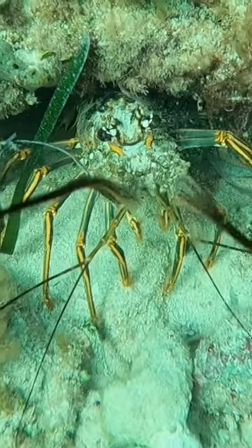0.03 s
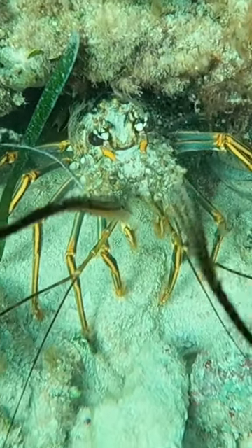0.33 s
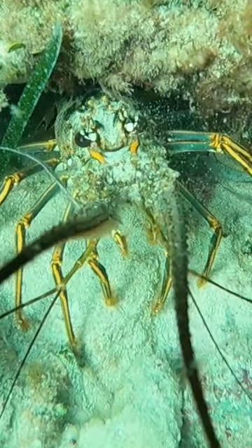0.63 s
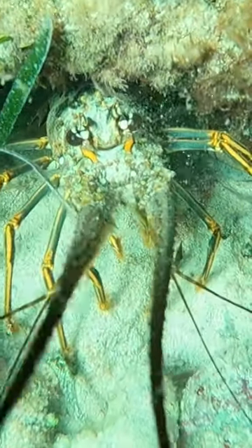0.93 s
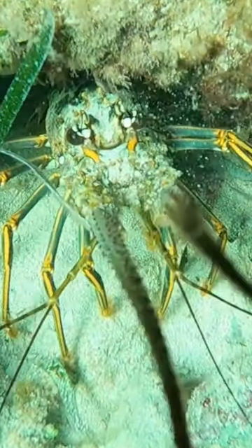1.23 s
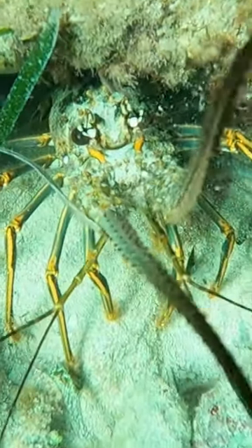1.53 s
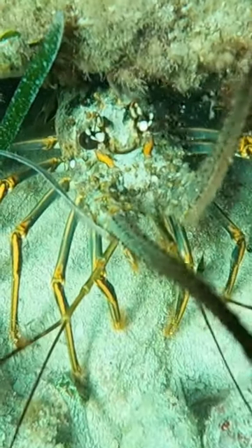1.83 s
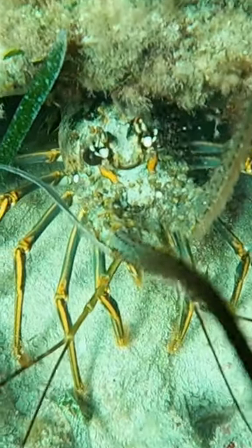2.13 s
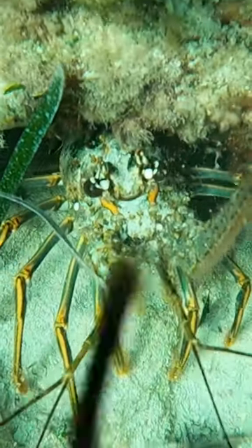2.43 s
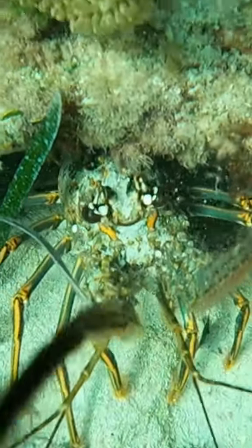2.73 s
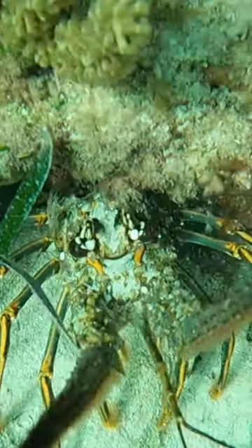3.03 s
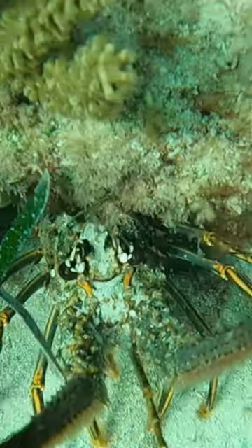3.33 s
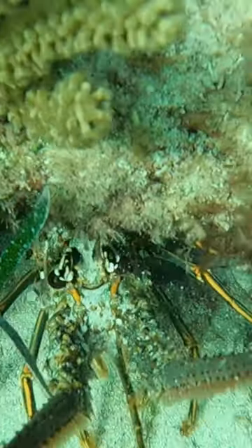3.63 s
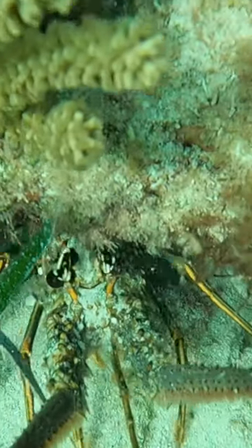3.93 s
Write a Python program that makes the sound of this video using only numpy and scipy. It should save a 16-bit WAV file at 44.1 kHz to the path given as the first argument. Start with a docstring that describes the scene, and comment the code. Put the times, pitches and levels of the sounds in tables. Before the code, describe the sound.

Water rumbles and washes against a hand-held camera's waterproof housing over a reef. Small muffled clicks and faint ticking run throughout, one hard knock hits the case before halfway, and brief gritty scrapes follow.

```python
"""Water sways against the waterproof housing of a hand-held camera over a reef: a deep surging rumble
and a fluttering wash. Short low tones are gulps of water and the hollow thump under harder clicks.
The reef ticks faintly. Small clicks and gritty scrapes come through the shell, and one hard knock
rings its modes. The housing muffles everything above 2 kHz."""
import sys
import numpy as np
from scipy import signal
from scipy.fft import rfft, irfft
from scipy.io import wavfile
from scipy.ndimage import uniform_filter1d, map_coordinates

SR = 44100
rng = np.random.default_rng(int(sys.argv[2]) if len(sys.argv) > 2 else 0)


def store_pcm(level_fs):
    """Save levels as 16-bit WAV."""
    pcm = np.round(np.clip(level_fs, -1, 1) * 32767).astype(np.int16)
    wavfile.write(sys.argv[1], SR, np.atleast_2d(pcm).T)


N = 176400

# Housing resonances. Each row: frequency in Hz, gain in dB, time to fall 60 dB in seconds.
HOUSING_MODES = [(313, -4, .09), (387, -14, .09), (449, 3.5, .052), (612, -7, .073), (677, 9, .05),
                 (774, -4.5, .11), (968, 6, .036), (1068, 8.5, .048), (1166, 4, .046), (1255, -2, .052),
                 (1330, -14, .08), (1477, 3, .028), (1642, -12, .055), (1750, -10, .045)]
# Transmission of the shell. Each row: frequency in Hz, gain in dB.
SHELL_RESPONSE = [(100, -13), (250, -4), (330, -1), (450, -3), (540, -7), (700, -6), (800, -1), (880, -4),
                  (1050, -.5), (1260, 4), (1450, -6), (1750, -5), (2050, -21), (2600, -31), (3300, -53),
                  (4200, -62)]
# Sizes of reef tick. Each row: pitch in Hz, relative level in dB.
TICK_BANDS = [(620, -5.5), (820, -10.5), (1050, 0.5), (1270, 0.5), (1500, -10), (1750, -13)]
# Swell of the ticking. Each row: time in seconds, gain in dB.
CRACKLE_SWELL = [(0, -0.5), (0.699, 0), (1.1, -0.5), (1.4, 1), (2.1, 0), (2.749, 0.5), (3.3, 3), (3.6, 3),
                 (3.72, -1.5), (4, -11.5)]
# Colour of a rub on the case. Each row: frequency in Hz, gain in dB.
RUB_SPECTRUM = [(150, -9), (380, -5.5), (560, -18.5), (700, -11.5), (810, 3), (900, -9.5), (1050, -3),
                (1270, 9.5), (1450, -4), (1700, -9), (2000, -21), (2600, -30.5), (3300, -56.5), (4200, -63)]
# Scrapes. Each row: start and length in seconds, relative level in dB, tilt in dB per octave.
SCRAPES = [(0.236, 0.032, -49, -2.5), (1.391, 0.052, -49, 5), (1.786, 0.084, -47, 8),
           (1.852, 0.13, -54, 3.5), (2.134, 0.033, -47, 5), (2.251, 0.17, -49, 3), (2.381, 0.064, -38, -3),
           (2.464, 0.1, -35.5, 0), (3.105, 0.075, -47, 2), (3.326, 0.098, -45.5, 0.5),
           (3.513, 0.16, -56, 2.5)]
# Clicks. Each row: start in seconds, relative level in dB, scatter decay in seconds,
# tilt in dB per octave.
CLICKS = [(0.031, -44.5, .01, -2.5), (0.135, -42.5, 0.0044, 4), (.213, -37.5, 0.01, -1.5),
          (.244, -38.5, 0.014, -1.5), (0.368, -48, 0.0075, 5), (0.573, -54, 0.0044, 6.5),
          (.636, -45, .004, 2.5), (.727, -32, 0.0036, -3), (.784, -47.5, .003, 1.5),
          (0.871, -49, 0.024, 0.5), (.943, -35.5, 0.0039, -4.5), (.965, -40.5, .01, -6),
          (.998, -39.5, 0.0088, -3), (1.152, -45, 0.0056, -5), (1.192, -47.5, .005, 3),
          (1.299, -48.5, 0.0047, -2.5), (1.468, -47, 0.0031, -0.5), (1.625, -48.5, 0.013, 7.5),
          (1.913, -48, 0.0047, -3.5), (1.963, -42.5, 0.0044, 3.5), (2.025, -35.5, 0.0074, -1.5),
          (2.076, -46.5, .004, -4), (2.138, -43, .007, 1.5), (2.175, -46.5, 0.0061, 2),
          (2.2321, -36, 0.004, 7.5), (2.271, -45, .003, 4.5), (2.299, -42, 0.0034, 2),
          (2.318, -35.5, 0.013, -0.5), (2.401, -37.5, .01, 3.5), (2.458, -37.5, 0.0075, 2),
          (2.49, -37.5, 0.0048, -3), (2.527, -33, 0.005, -3), (2.927, -37.5, 0.0059, -1),
          (3.0441, -35.5, 0.0016, -2.5), (3.066, -35.5, .006, -0.5), (3.128, -45, 0.0025, 3.5),
          (3.188, -26.5, 0.0023, 0.5), (3.2375, -35.5, 0.0045, 1), (3.286, -41, .002, 2),
          (3.347, -45, 0.014, -0.5), (3.385, -39, 0.0066, 2.5), (3.448, -41, 0.0074, -0.5),
          (3.575, -43.5, 0.0087, -2.5), (3.597, -38.5, 0.0045, -0.5), (3.79, -40, 0.0016, 2.5)]
# Contacts of the knock. Each row: start in seconds, relative level in dB, tilt in dB per octave.
KNOCK_CONTACTS = [(1.4999, -5.5, 2), (1.5014, -2.5, 3.5), (1.5033, -1, -2.5), (1.5104, -9.5, 3),
                  (1.513, -15, 2.5)]
# Water gulps and thumps under harder clicks. Each row: start in seconds, pitch in Hz,
# relative level in dB, rise and decay in seconds, glide in octaves per second.
LOW_TONES = [(0.321, 138.7, -34.5, 0.017, 0.038, 1.5), (0.403, 329, -29.5, 0.0094, 0.013, -2.5),
             (0.404, 640, -50.5, 0.0092, 0.025, 2.5), (0.478, 145.6, -35, 0.0097, 0.015, 7),
             (0.599, 131, -34, 0.0092, 0.018, -11.5), (0.6, 352, -40, 0.0065, 0.0088, -3),
             (0.641, 345, -40.5, 0.01, 0.017, -4.5), (0.726, 479, -34, 0.0014, 0.0057, -2),
             (.877, 470, -32.5, 0.008, 0.019, -7.5), (0.942, 280.4, -38.5, 0.011, 0.04, -0.5),
             (1.16, 155.6, -37.5, .015, 0.019, 2.5), (1.342, 350, -38, 0.0047, 0.013, -0.5),
             (1.347, 159, -46, .008, 0.022, 2), (1.744, 364, -41.5, 0.0026, 0.028, -2.5),
             (2.027, 330, -42, 0.0069, 0.019, -1.5), (2.082, 167.5, -31, 0.0078, 0.034, -1.5),
             (2.077, 572, -42, 0.0094, 0.0099, -8), (2.199, 214.5, -38.5, 0.011, 0.068, 0),
             (2.482, 340, -41, 0.005, 0.013, 0), (2.688, 330, -34.5, 0.006, 0.0072, 3.5),
             (2.679, 191.3, -33.5, 0.0094, 0.038, 1), (2.683, 65.5, -36.5, 0.017, 0.099, 2),
             (2.777, 205.4, -45.5, 0.014, 0.17, 0), (2.825, 323, -49, 0.0036, 0.013, -14),
             (3.186, 150.8, -39.5, 0.0029, 0.068, 0), (3.188, 413, -44, 0.0075, 0.011, 6),
             (3.759, 291.3, -45, 0.011, 0.07, -1), (3.829, 71.5, -32.5, 0.037, 0.079, -2),
             (3.861, 147.2, -39, 0.027, 0.098, 0.5)]
# Spectra of the wash, rumble and pressure sway. Each row: frequency in Hz, relative density in dB.
WASH_SPECTRUM = [(40, -4.5), (60, 0.5), (85, 8), (120, -4), (157, 6), (190, -6), (225, -9), (252, -20),
                 (305, 6), (380, -5.5), (440, 1.5), (520, -16), (680, -15.5), (900, -17.5), (2000, -29.5),
                 (4000, -83.5)]
RUMBLE_SPECTRUM = [(10, -31), (20, 4.5), (29, 6), (36, -11), (45, -14.5), (70, -25), (200, -80)]
SWAY_SPECTRUM = [(1, -20.5), (3.5, 0), (9.5, 1.5), (15, -16), (21, -24), (30, -43), (60, -67), (200, -100)]
# Strength of the wash and rumble. Each row: time in seconds, level in dB.
WASH_LEVELS = [(0, -42.5), (.15, -51), (.42, -45), (.68, -48.5), (.8, -55), (1.0, -55), (1.1, -48.5),
               (1.28, -47), (1.4, -43.5), (1.65, -51.5), (1.95, -48), (2.25, -46), (2.5, -49),
               (2.62, -48.5), (2.72, -47), (3.0, -45.5), (3.22, -43.5), (3.65, -50), (4, -52.5)]
RUMBLE_LEVELS = [(0, -32.5), (.11, -24.5), (.25, -38), (.45, -40.5), (.7, -45), (.97, -35.5), (1.15, -41),
                 (1.55, -41.5), (1.95, -35.5), (2.45, -37), (2.75, -32), (3.1, -41), (3.3, -46),
                 (3.58, -29.5), (3.72, -43), (4, -44)]

EDGE_HZ, EDGE_WIDTH = 2500, 0.4  # bright band of hard impacts


def undb(db):
    """Decibels to gain."""
    return 10 ** (np.asarray(db) / 20)


def unit(x):
    """Scale to rms 1."""
    return x / np.sqrt(np.mean(x ** 2))


def clock():
    """Time in seconds."""
    return np.arange(N) / SR


def contour_db(points):
    """Level line through (s, dB) points."""
    return np.interp(clock(), *np.array(points).T)


def colour(x, points):
    """Minimum-phase filter through (Hz, dB) points."""
    n = len(x)
    hz, db = np.array(points).T
    bins_hz = np.maximum(np.fft.rfftfreq(2 * n, 1 / SR), hz[0])
    gain = undb(np.interp(np.log(bins_hz), np.log(hz), db))
    cepstrum = irfft(np.log(gain))
    causal_fold = np.concatenate([[1], np.full(n - 1, 2), np.zeros(n)])
    return irfft(rfft(x, 2 * n) * np.exp(rfft(cepstrum * causal_fold)))[:n]


def butter(x, hz, order, kind="lowpass"):
    """Butterworth filter."""
    return signal.sosfilt(signal.butter(order, hz, kind, fs=SR, output="sos"), x + 1e-18)


def band(x, hz, width, order=3):
    """Band-pass with edges a factor 1 + width either side of hz."""
    return butter(x, [hz / (1 + width), hz * (1 + width)], order, "bandpass")


def add_tilted(out, start_s, x, db_per_octave, pivot_hz=1100, span_hz=(300, 2800)):
    """Mix in a short sound, made brighter or duller."""
    slope = [(hz, db_per_octave * np.log2(hz / pivot_hz)) for hz in span_hz]
    start = int(start_s * SR)
    out[start:start + len(x)] += colour(x, slope)[:N - start]


def walk(rate_hz):
    """Smooth random drift, rms 1."""
    hold = int(SR / rate_hz)
    steps = np.repeat(rng.standard_normal(N)[:N // hold + 1], hold)
    return unit(uniform_filter1d(steps, hold)[:N])


def pulses(rows):
    """One pulse per (s, dB, ..) row."""
    out = np.zeros(N)
    for start_s, db, *_ in rows:
        out[int(start_s * SR)] += undb(db)
    return out


def grit(per_s, spread_db):
    """Random tiny impacts, a few stronger than the rest."""
    hits = rng.random(N) < per_s / SR
    signs = rng.choice([-1, 1], N)
    return hits * signs * undb(spread_db * np.minimum(rng.exponential(size=N), 4))


def housing_ring(x):
    """Damped modes of the housing, driven by x."""
    t = clock()[:SR // 4]
    modes = sum(undb(db) * np.sin(2 * np.pi * hz * t) * np.exp(-np.log(1000) * t / t60_s)
                for hz, db, t60_s in HOUSING_MODES)
    return signal.fftconvolve(x, modes)[:N]


def through_shell(x, response, ring_gain_db=-48):
    """Contact heard inside the housing: muffled, with a little ring."""
    return colour(x + undb(ring_gain_db) * housing_ring(x), response)


def reef_crackle(base_db=-64, clump_db=1.5, clump_hz=18):
    """Faint, ceaseless ticking of the reef, in clumps."""
    ticks = sum(undb(db) * unit(band(grit(per_s=80, spread_db=1.5), hz, width=0.21))
                for hz, db in TICK_BANDS)
    level_db = base_db + contour_db(CRACKLE_SWELL) + clump_db * walk(clump_hz)
    return undb(level_db) * unit(ticks)


def scrapes(gain_db=-3):
    """Short gritty rubs on the case; pressure rises and falls in each."""
    out, t = np.zeros(N), clock()[:SR // 4]
    rub = unit(through_shell(grit(per_s=550, spread_db=2), RUB_SPECTRUM))
    for start_s, length_s, db, tilt in SCRAPES:
        pressure = undb(db + gain_db) * np.sin(np.pi * np.minimum(t / length_s, 1))
        add_tilted(out, start_s, pressure * rub[int(start_s * SR):][:len(t)], tilt)
    return out


def clicks(snap_gain_db=27.5, scatter_gain_db=-17.5, edge_gain_db=24, thud_gain_db=53):
    """Snaps with a short scatter, through the shell; harder ones add more edge and thump the case."""
    snaps, t = np.zeros(N), clock()[:SR // 8]
    for start_s, db, decay_s, tilt in CLICKS:
        scatter = undb(scatter_gain_db) * np.exp(-t / decay_s) * rng.standard_normal(len(t))
        add_tilted(snaps, start_s, undb(db) * (signal.unit_impulse(len(t)) + scatter), tilt)
    hardness = pulses(CLICKS) ** 2
    edge = undb(edge_gain_db) * band(hardness, EDGE_HZ, EDGE_WIDTH)
    thud = undb(thud_gain_db) * band(hardness, hz=238, width=0.37, order=2)
    return undb(snap_gain_db) * through_shell(snaps, SHELL_RESPONSE) + edge + thud


def knock(ring_gain_db=-26.5, crack_gain_db=-31, edge_gain_db=-64, crack_decay_s=0.008):
    """Something hard grazes the housing, lands and bounces: a brief crack, and the case rings."""
    contacts = np.zeros(N)
    for start_s, db, tilt in KNOCK_CONTACTS:
        add_tilted(contacts, start_s, undb(db) * signal.unit_impulse(SR // 8), tilt)
    pole = np.exp(-1 / (crack_decay_s * SR))
    envelope = signal.lfilter([1], [1, -pole], pulses(KNOCK_CONTACTS) + 1e-18)
    crack = envelope * unit(colour(rng.standard_normal(N), SHELL_RESPONSE))
    edge = envelope * unit(band(rng.standard_normal(N), EDGE_HZ, EDGE_WIDTH))
    push = butter(contacts, hz=(360, 1740), order=3, kind="bandpass")
    ring = housing_ring(butter(push, hz=2650, order=4))
    return undb(ring_gain_db) * ring + undb(crack_gain_db) * crack + undb(edge_gain_db) * edge


def low_tones(gain_db=-0.5, noise_gain_db=-9.5):
    """Short low tones: gulps of water, and the hollow thump under the harder clicks on the case."""
    out, t = np.zeros(2 * N), clock()[:SR // 2]
    for start_s, hz, db, rise_s, decay_s, octaves_per_s in LOW_TONES:
        attack = np.sin(np.pi / 2 * np.minimum(t / rise_s, 1)) ** 2
        envelope = attack * np.exp(-np.maximum(t - rise_s, 0) / decay_s)
        tone = np.sin(2 * np.pi * np.cumsum(hz * 2 ** (octaves_per_s * t)) / SR)
        noise = undb(noise_gain_db) * unit(band(rng.standard_normal(len(t)), hz, width=0.41))
        start = int(start_s * SR)
        out[start:start + len(t)] += undb(db + gain_db) * envelope * (tone + noise)
    return out[:N]


def eddy(drift_share=0.05, drift_hz=7, flutter_db=4, flutter_hz=22.06):
    """One strand of the wash: resonances drift in pitch, strength flutters."""
    position = np.cumsum(np.exp(drift_share * walk(drift_hz)))
    steady = colour(rng.standard_normal(N), WASH_SPECTRUM)
    drifting = map_coordinates(steady, [position], mode="mirror")
    return drifting * undb(flutter_db * walk(flutter_hz))


def water(sway_db=-20.5):
    """Moving water at the case: fluttering wash, surging rumble, slow pressure swings."""
    wash = undb(contour_db(WASH_LEVELS)) * unit(eddy() + eddy())
    rumble = undb(contour_db(RUMBLE_LEVELS)) * unit(colour(rng.standard_normal(N), RUMBLE_SPECTRUM))
    sway = undb(sway_db) * unit(colour(rng.standard_normal(N), SWAY_SPECTRUM))
    return wash + rumble + sway


def scene():
    """All sources at one microphone inside the housing."""
    return (water() + low_tones() + scrapes() + reef_crackle() + clicks() + knock())[None]


def record(dry):
    """The camera joins low-rate samples by straight lines: a faint glint near 10 and 12 kHz."""
    step_samples, top_hz = 4, 13600
    index = np.arange(N)
    dull = butter(dry[0], hz=3600, order=8)
    coarse = np.interp(index, index[::step_samples], dull[::step_samples])
    top_cut = signal.ellip(8, 0.2, 70, top_hz, fs=SR, output="sos")
    return signal.sosfilt(top_cut, coarse)[None]


dry = scene()
out = record(dry)
store_pcm(out)
```